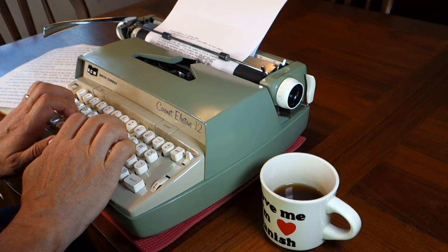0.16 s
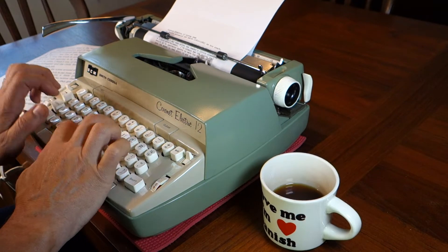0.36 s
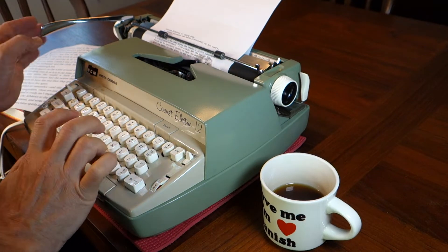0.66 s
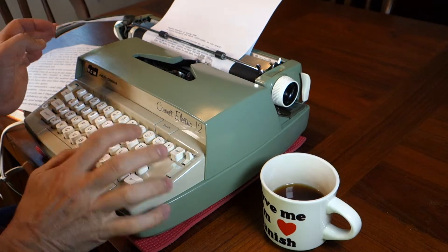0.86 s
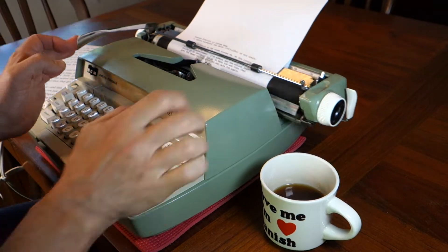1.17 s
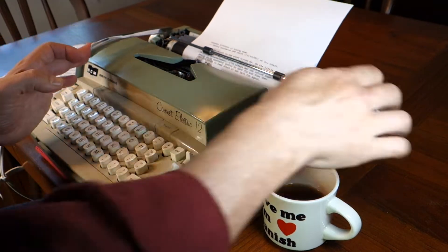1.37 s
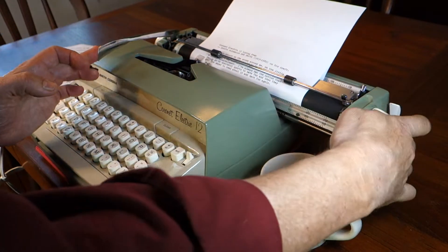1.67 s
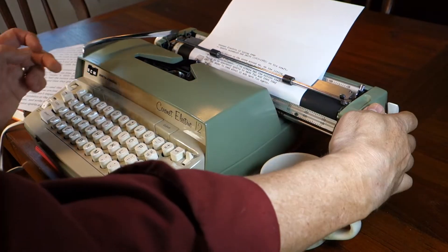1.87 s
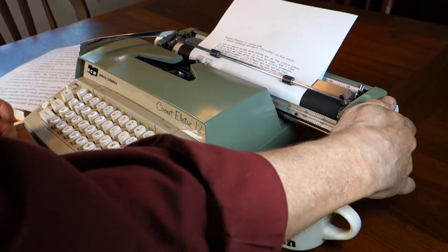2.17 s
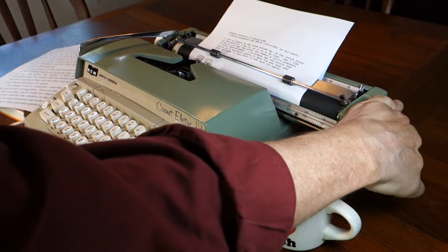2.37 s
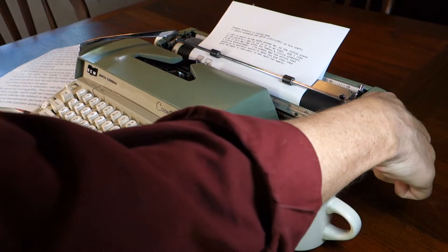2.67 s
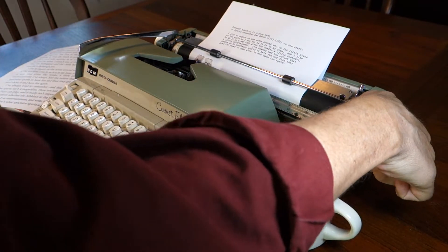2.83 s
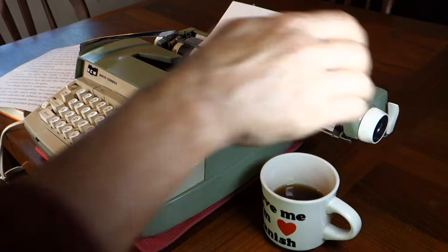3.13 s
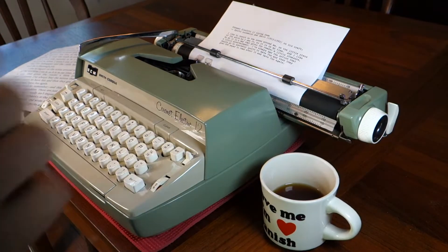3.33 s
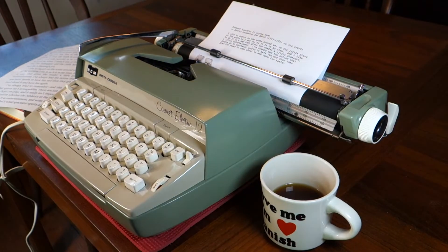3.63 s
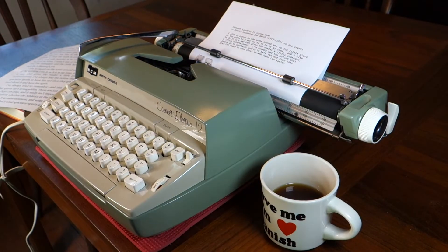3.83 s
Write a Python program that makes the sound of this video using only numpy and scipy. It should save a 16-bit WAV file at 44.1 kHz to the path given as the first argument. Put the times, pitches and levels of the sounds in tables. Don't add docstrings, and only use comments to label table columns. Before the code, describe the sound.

An electric typewriter cracks out a few keystrokes, its carriage rolls, then a ratcheted knob clicks

```python
import sys
import numpy as np
from scipy import signal
from scipy.fft import rfft, irfft
from scipy.io import wavfile
from scipy.ndimage import uniform_filter1d

SR = 44100
rng = np.random.default_rng(int(sys.argv[2]) if len(sys.argv) > 2 else 0)


def to_linear_factor(level_db):
    exponent = np.asarray(level_db, float) / 20
    return 10 ** exponent


def pcm_store(signal):
    levels = np.round(np.clip(np.atleast_2d(signal), -1, 1) * 32767)
    wavfile.write(sys.argv[1], SR, levels.astype(np.int16).T)


N = 176400
LEAD_S = 0.1
PAD = int(LEAD_S * SR)
M = N + PAD
T = np.arange(M) / SR - LEAD_S


def sample_at(start_s):
    return int((start_s + LEAD_S) * SR)


def curve(table, hz):
    table_hz, value = np.array(table).T
    return np.interp(np.log(hz + 1), np.log(table_hz), value)


def body(x, tone, ring=(), ring_db=0., size=8192):
    f = np.fft.rfftfreq(size, 1 / SR)
    power = to_linear_factor(curve(tone, f)) ** 2
    for hz, width_hz, db in ring:
        detune = 2 * (f - hz) / max(width_hz, 80)
        power = power + to_linear_factor(db + ring_db) ** 2 / (1 + detune ** 2)
    cepstrum = irfft(np.log(power) / 2)
    cepstrum[1:size // 2] *= 2
    cepstrum[size // 2 + 1:] = 0
    response = irfft(np.exp(rfft(cepstrum)))[:size // 2]
    return signal.fftconvolve(x, response / np.sqrt(np.sum(response ** 2)))[:M]


def hits(rows, rattle_s, rattle_db, size=4096):
    x = np.zeros(M + size)
    fade = to_linear_factor(rattle_db) * np.exp(-np.arange(size) / SR / rattle_s)
    for start_s, db in rows:
        push = fade * rng.standard_normal(size)
        push[0] = 1
        i = sample_at(start_s)
        x[i:i + size] += to_linear_factor(db) * push
    return x[:M]


def taps(rows, contact_s, size=1024):
    x = np.zeros(M + size)
    t = np.arange(size) / SR / contact_s
    for start_s, db in rows:
        i = sample_at(start_s)
        x[i:i + size] += to_linear_factor(db) * rng.standard_normal(size) * t * np.exp(1 - t)
    return x[:M]


def grit(scatter_db):
    unevenness = np.minimum(rng.exponential(size=M), 5)
    x = rng.standard_normal(M) * to_linear_factor(scatter_db * unevenness)
    return x / x.std()


def swells(rows):
    out = np.zeros(M)
    for start_s, rise_s, t60_s, db in rows:
        i = sample_at(start_s)
        t = T[i:i + int((rise_s + 1.5 * t60_s) * SR)] - start_s
        fall = to_linear_factor(-60 * np.maximum(t - rise_s, 0) / t60_s)
        out[i:i + len(t)] += to_linear_factor(db) * np.clip(t / rise_s, 0, 1) * fall
    return out


def level(rows):
    s, db = np.array(rows).T
    return to_linear_factor(np.interp(T, s, db, left=-120, right=-120))


def walk(rate_hz):
    k = int(SR / rate_hz)
    w = uniform_filter1d(uniform_filter1d(rng.standard_normal(M), k), k)
    return w / w.std()


# frequency in Hz, likeness 0-1.
LIKENESS = [(100, 0.99), (400, 0.94), (1000, 0.85), (4000, 0.56), (9000, 0)]


def alike(a, b):
    c = np.clip(curve(LIKENESS, np.fft.rfftfreq(len(a), 1 / SR)), 0, 1)
    mid = rfft(a) * np.sqrt((1 + c) / 2)
    side = rfft(b) * np.sqrt((1 - c) / 2)
    return irfft(np.array([mid + side, mid - side]), len(a))


# frequency in Hz, rms level in dB.
MOTOR_HUM = [(238, -62.5), (745, -69.5), (850, -70)]
# frequency in Hz, level in dB.
WHIRR_TONE = [(30, -25), (70, -31.5), (120, -23.5), (239, -12.5), (355, -17), (842, -12.5), (1030, -18),
              (1720, -19.5), (4500, -27.5), (11000, -32.5), (14300, -71)]
# time in seconds, gain in dB.
TABLE_COUPLING = [(.1, 3), (.8, -1), (1.07, -3), (1.19, 6), (1.26, -6), (1.4, 2), (1.66, -7), (1.73, 3),
                  (2.3, -5), (3.07, -6), (3.13, 3), (3.31, 7), (3.36, -8), (3.44, 9), (3.53, -2),
                  (3.68, -6), (3.73, 4), (4, -3)]
# start in seconds, rise in seconds,
# fall (t60) in seconds, level in dB.
ROLLER_CHIRPS = [
    (3.295, 0.016, 0.28, -55),
    (3.39, .02, .3, -60),
]
# frequency in Hz, width in Hz, level in dB.
ROLLER_RING = [(1716, 80, 25), (2100, 80, 21)]
# frequency in Hz, level in dB.
PAPER_COLOUR = [(35, -62), (60, -50), (222, -3), (322, -8.5), (753, -4), (1580, -5), (11000, -10),
                (14300, -47), (22000, -120)]


def motor():
    flutter_db, line_width_hz, whirr_db = walk(20), 1.5, -55.5
    hum = np.zeros(M)
    for hz, db in MOTOR_HUM:
        phase = 2 * np.pi * np.cumsum(hz + line_width_hz * walk(25)) / SR
        hum += to_linear_factor(db + 1.5 + flutter_db) * np.sin(phase)
    noises = [body(to_linear_factor(1.2 * walk(36)) * rng.standard_normal(M), WHIRR_TONE) for _ in range(2)]
    chirp = body(swells(ROLLER_CHIRPS) * grit(1.5), PAPER_COLOUR, ROLLER_RING)
    coupling_db = np.interp(T, *np.array(TABLE_COUPLING).T)
    whirr = to_linear_factor(whirr_db + 0.035 * coupling_db) * alike(*noises)
    return to_linear_factor(coupling_db) * hum + whirr + chirp


# start in seconds, peak in dB.
FIRST_STRIKE = [
    (-0.036, 1),
]
TYPEBARS = [
    (0.2261, -1),
    (0.3126, -3),
    (0.4148, -1),
]
# frequency in Hz, level in dB.
TYPEBAR_TONE = [(35, -67), (60, -42.5), (264, -46), (427, -17.5), (978, -13.5), (1390, -5.5), (5020, -0.5),
                (6240, 2), (11000, -8.5), (14300, -39), (22000, -120)]
# frequency in Hz, width in Hz, level in dB.
TYPEBAR_RING = [(5860, 300, 1.5), (6150, 150, 8), (6200, 160, 3)]
# start in seconds, peak in dB.
KEY_BOTTOMS = [
    (.1965, -33),
    (.455, -27),
]
# frequency in Hz, width in Hz, level in dB.
HOLLOW_KEY = [(867, 73, 9.8), (470, 27, 1.4)]
# start, rise and fall (t60) in seconds, level in dB.
LEVERS = [(0, 0.0021, 0.12, -24), (.195, 0.0015, 0.043, -28), (.26, 0.0076, 0.15, -25),
          (.35, 0.0062, 0.2, -24.5), (.445, 0.0067, 0.1, -24), (.547, 0.022, 0.14, -29.5),
          (.61, 0.018, 0.074, -29)]
# frequency in Hz, level in dB.
LEVER_TONE = [(35, -65), (60, -82), (675, -11), (839, -5), (1020, -7.5), (2500, -6.5), (3170, -7),
              (11000, -14.5), (14300, -53), (22000, -120)]
# frequency in Hz, width in Hz, level in dB.
LEVER_RING = [(453, 57, -3), (2640, 40, -9), (3330, 91, -13)]


def keys():
    strikes = body(hits(FIRST_STRIKE + TYPEBARS, 0.0086, -18.5), TYPEBAR_TONE, TYPEBAR_RING)
    bottoms = body(taps(KEY_BOTTOMS, 0.0017), LEVER_TONE, HOLLOW_KEY)
    clatter = body(swells(LEVERS) * grit(0.7), LEVER_TONE, LEVER_RING)
    return to_linear_factor(4) * strikes + bottoms + to_linear_factor(-3) * clatter


# start in seconds, peak
# in dB.
CAM_TRIPS = [
    (.1773, -30.5),
    (.186, -34),
    (.2205, -30),
    (.830, -50),
]
# start in seconds, peak in dB.
SPACE_BAR = [
    (0.5803, -5.5),
]
# start in seconds, peak in dB.
CARRIAGE_STOP = [(1.537, -34), (1.539, -26.5), (1.5415, -25), (1.5455, -27.5), (1.549, -33), (1.556, -36)]
# start in seconds, peak in dB.
SMALL_CATCHES = [(.548, -14), (1.5055, -32), (1.7509, -38), (1.8068, -39), (3.5658, -44), (3.7658, -35),
                 (3.772, -30), (3.776, -40)]
# frequency in Hz, level in dB.
METAL_TONE = [(180, -60), (300, -12.5), (1130, -10), (1800, 2), (2160, -5.5), (2790, 1), (11000, -7.5),
              (14300, -92), (22000, -120)]


def clacks():
    big = body(hits(SPACE_BAR, 0.0069, -12.5) + taps(CARRIAGE_STOP, 0.001), METAL_TONE)
    small = body(hits(SMALL_CATCHES, 0.0024, -6.5), METAL_TONE)
    trips = body(taps(CAM_TRIPS, 0.001), TYPEBAR_TONE, TYPEBAR_RING)
    return to_linear_factor(2.5) * big + to_linear_factor(-1.5) * small + trips


# start, rise and fall (t60) in seconds, level in dB.
LATCH_SCRAPE = [
    (.841, 0.0065, 0.021, -22),
]
# start in seconds, peak in dB.
LATCH_SNAPS = [
    (.8462, -31),
    (.8642, -30),
    (.869, -33),
    (.8768, -35),
]
# frequency in Hz, level in dB.
LATCH_TONE = [(35, -59), (60, -7), (531, -15), (1020, -16), (1880, -10), (3500, -1), (7760, -2),
              (11000, -1), (14300, -44), (22000, -120)]
# frequency in Hz, width in Hz, level in dB.
LATCH_RING = [(1825, 130, 9), (3100, 300, 2), (3700, 250, -1), (7700, 350, 3)]


def latch():
    return body(swells(LATCH_SCRAPE) * grit(0.57) + taps(LATCH_SNAPS, 0.0022), LATCH_TONE, LATCH_RING)


# start, rise and fall (t60) in seconds, level in dB.
CASE_BUMPS = [(.85, 0.018, 0.17, -39.5), (1.54, 0.0022, 0.092, -32), (1.87, 0.016, 0.1, -34.5),
              (2.455, 0.0092, 0.055, -44), (2.695, 0.01, 0.84, -43), (2.764, 0.0044, 0.039, -29.5),
              (2.917, 0.0026, 0.13, -26.5)]
# frequency in Hz, level in dB.
CASE_TONE = [(24, -55), (40, -33.5), (410, -7), (773, -13.5), (890, -1.5), (1560, -11), (1720, -7.5),
             (7040, -21), (11000, -34), (14300, -67), (22000, -120)]
# frequency in Hz, width in Hz, level in dB.
BUMPED_RING = [(1760, 97, -5)]
# start in seconds, peak in dB.
FEET_THUDS = [
    (2.9185, -9),
    (2.9305, -12),
    (2.9395, -14),
]
# frequency in Hz, level in dB.
FEET_TONE = [(30, -22), (90, -21), (240, 5), (1000, 2), (2400, -23), (6000, -40), (22000, -120)]
# frequency in Hz, width in Hz, level in dB.
FEET_RING = [(240, 110, -8), (418, 150, 9), (690, 140, 9.5), (854, 92, -1), (1000, 73, 0), (1335, 81, -9),
             (1810, 130, -3)]
# start, rise and fall (t60) in seconds, level in dB.
PAPER_RUSTLES = [(2.715, 0.0074, 0.058, -45), (2.765, 0.0073, 0.4, -64), (3.27, 0.036, 1.2, -58.5),
                 (3.525, 0.02, 0.24, -46), (3.553, 0.013, 0.19, -41), (3.76, .01, 0.18, -58)]


def hand():
    bumps = body(swells(CASE_BUMPS) * grit(2.4), CASE_TONE, BUMPED_RING, -2.2)
    thuds = body(hits(FEET_THUDS, 0.0036, -18), FEET_TONE, FEET_RING)
    paper = body(swells(PAPER_RUSTLES) * grit(5.4), PAPER_COLOUR)
    return bumps + thuds + to_linear_factor(-3.5) * paper


# start, rise and fall (t60) in seconds, level in dB.
CARRIAGE_SHUDDER = [
    (.851, 0.0052, 0.073, -31),
]
# time in seconds, level in dB.
ROLLING = [(.9, -57), (.97, -40), (1.03, -37.5), (1.12, -37.5), (1.2, -39), (1.27, -39), (1.35, -39.5),
           (1.44, -45), (1.535, -41.5)]
# start, rise and fall (t60) in seconds, level in dB.
RAIL_JOLTS = [(1.022, 0.0031, 0.069, -39), (1.055, 0.0029, 0.046, -48), (1.11, 0.0049, 0.063, -36),
              (1.16, .004, 0.074, -39.5), (1.21, 0.0047, 0.048, -38.5), (1.32, 0.0037, 0.052, -49),
              (1.443, .003, 0.029, -56)]
# frequency in Hz, level in dB.
RAILS_TONE = [(35, -71), (60, -59), (232, -28.5), (264, -22), (466, -13), (1070, -7.5), (4210, -9),
              (11000, -17), (14300, -56), (22000, -120)]
# frequency in Hz, width in Hz, level in dB.
RAILS_RING = [(940, 130, -5.5), (1590, 90, -2.5), (2700, 81, -9), (3600, 120, -8), (4200, 140, -4)]


def carriage():
    shudder = body(swells(CARRIAGE_SHUDDER) * grit(0.85), METAL_TONE)
    roll = level(ROLLING) * to_linear_factor(1.2 * walk(40) - 4) + swells(RAIL_JOLTS)
    return shudder + to_linear_factor(-4) * body(roll * grit(4.3), RAILS_TONE, RAILS_RING, -0.1)


# start in seconds, peak in dB.
RATCHET = [(1.8365, -27), (1.8608, -23), (1.8764, -25), (1.8835, -27), (1.9614, -30), (1.9755, -29),
           (2.0136, -33), (2.019, -28), (2.0298, -47), (2.067, -29), (2.115, -32), (2.123, -33.5),
           (2.196, -30.5), (2.2552, -29.5), (2.3305, -34.5), (2.4263, -33), (2.541, -33), (2.674, -42)]
# time in seconds, level in dB.
PLATEN_DRAG = [(1.833, -34), (1.9, -31.5), (1.94, -53), (2.03, -42.5), (2.1, -51.5), (2.3, -49),
               (2.38, -53.5), (2.46, -50), (2.53, -47.5), (2.6, -61), (2.64, -48.5), (2.7, -59)]
# frequency in Hz, level in dB.
PLATEN_TONE = [(35, -51), (60, -50), (237, -1), (259, -10.5), (446, 1), (1510, -4.5), (1840, 0.5),
               (11000, -6), (14300, -69), (22000, -120)]
# frequency in Hz, width in Hz, level in dB.
RATCHET_RING = [(1770, 87, 9.5), (3260, 560, 8.5), (5500, 210, 1.5), (7700, 320, -1)]


def knob():
    climb_s, climb_db, tooth_cut_hz = 0.018, -14.5, 2370
    climb = swells([(s - climb_s, climb_s, .05, db + climb_db) for s, db in RATCHET[4:15]])
    turning = to_linear_factor(-3) * level(PLATEN_DRAG) * to_linear_factor(1.6 * walk(50))
    drag = (turning + climb) * grit(1.0)
    highpass = signal.butter(2, tooth_cut_hz, "high", fs=SR)
    snaps = signal.lfilter(*highpass, taps(RATCHET, .0006))
    return (to_linear_factor(0.5) * body(snaps, PLATEN_TONE, RATCHET_RING)
            + body(drag, PLATEN_TONE, RATCHET_RING, -4))


def near(x, size=256):
    fade_s, reflection_db = 0.0014, -4
    h = rng.standard_normal(size) * np.exp(-np.arange(size) / SR / fade_s)
    h = np.r_[-h[::-1], 0, h]
    reflected = signal.fftconvolve(x, h / np.sqrt(np.sum(h ** 2)), "same")
    return x + to_linear_factor(reflection_db) * alike(np.zeros(M), reflected)


# frequency in Hz, t60 in seconds.
REVERB_T60 = [(200, 0.38), (1400, 0.35), (9700, 0.3)]


def room(x, size=512):
    fill_s, grain_db = 0.007, 2.5
    opt = dict(nperseg=size, noverlap=size * 3 // 4)
    f, _, z = signal.stft(np.roll(x, int(fill_s * SR)), SR, **opt)
    keep = to_linear_factor(-120 * size / 4 / SR / curve(REVERB_T60, f))
    power = uniform_filter1d(np.abs(z) ** 2, size=3, axis=0) * (1 - keep[:, None])
    for i in range(1, power.shape[1]):
        power[:, i] += keep * power[:, i - 1]
    grain = signal.stft(alike(grit(grain_db), grit(grain_db)), SR, **opt)[2]
    tail = grain * np.sqrt(power / np.mean(np.abs(grain) ** 2))
    return signal.istft(tail, SR, **opt)[1][:, :M]


# frequency in Hz, level in dB.
EVEN_TONE = [(20, 0), (20000, 0)]
# frequency in Hz, width in Hz,
# level over flat in dB.
HOLLOW_CASE = [(460, 33, 2.5), (745, 36, 2.5)]


def scene():
    echo_s, echo_db = 0.0245, -14.5
    parts = [(keys(), 6.5), (clacks(), 1), (latch(), -5), (hand(), 3), (carriage(), 2), (knob(), -3)]
    wet = sum(x * to_linear_factor(db) for x, db in parts)
    direct = sum(x for x, db in parts) + to_linear_factor(echo_db) * np.roll(wet, int(echo_s * SR))
    heard = [body(ear, EVEN_TONE, HOLLOW_CASE) for ear in near(direct) + room(wet)]
    return (np.array(heard) + motor())[:, PAD:]


def band_limit(x):
    return signal.sosfilt(signal.butter(12, 12360, fs=SR, output="sos"), x)


def record(dry):
    top_hz, bass_cut_hz = 11000, 71
    lowpass = signal.ellip(10, .3, 80, top_hz, fs=SR, output="sos")
    x = signal.sosfilt(lowpass, dry)
    x = signal.lfilter(*signal.butter(2, bass_cut_hz, "high", fs=SR), x)
    return band_limit(x)


dry = scene()
out = record(dry)
pcm_store(out)
```